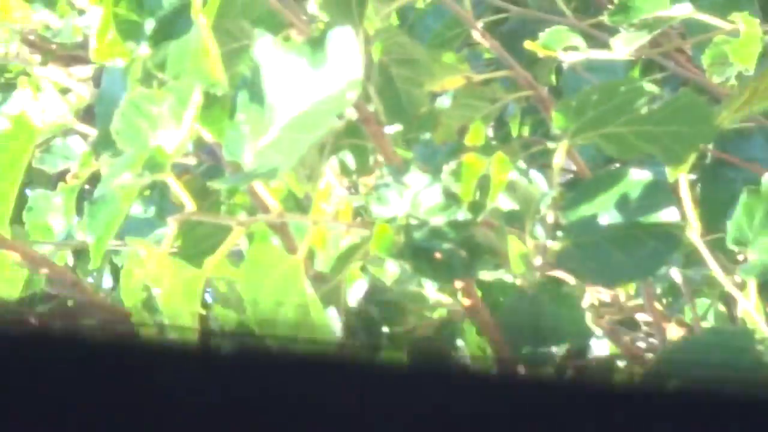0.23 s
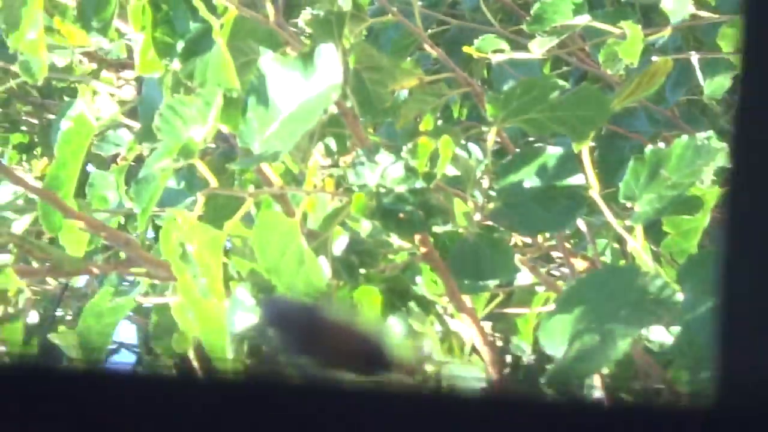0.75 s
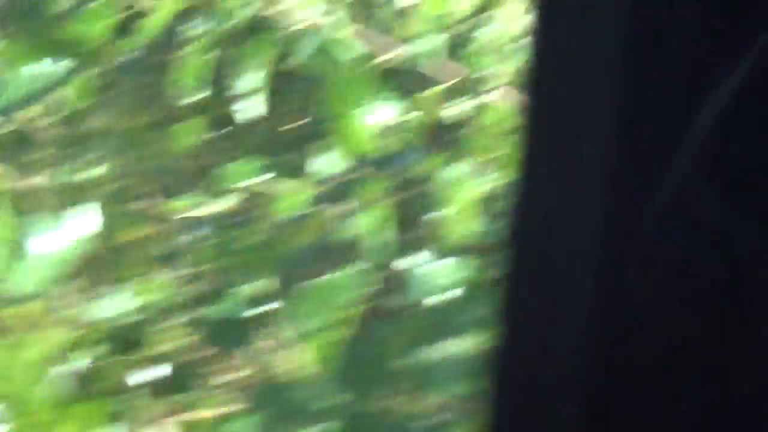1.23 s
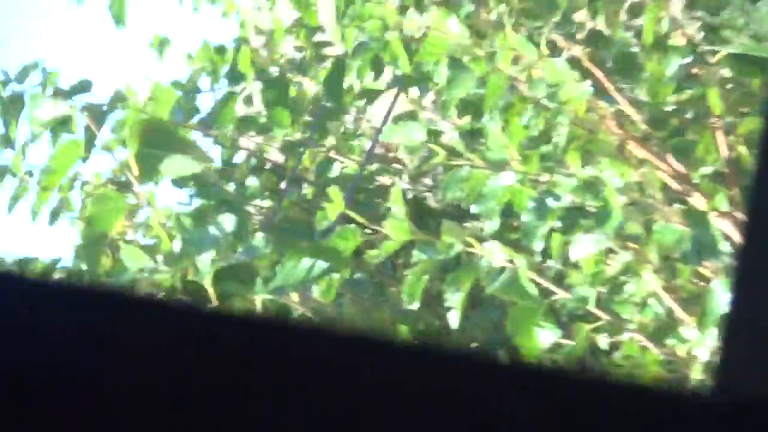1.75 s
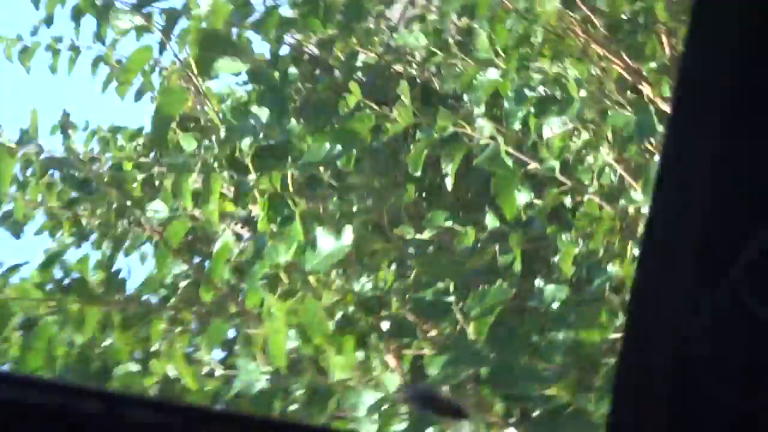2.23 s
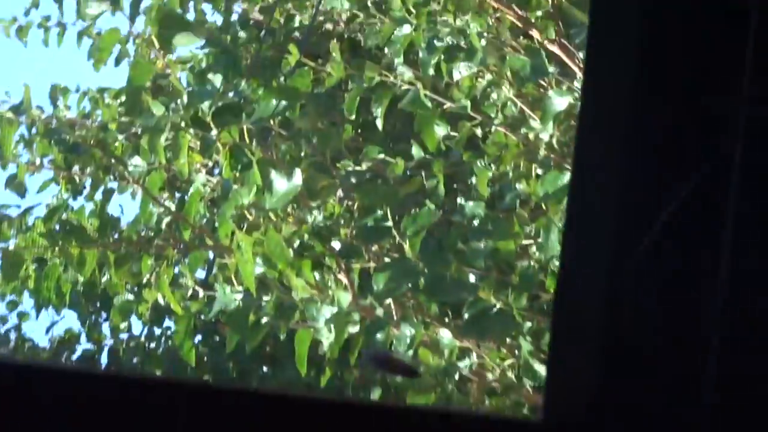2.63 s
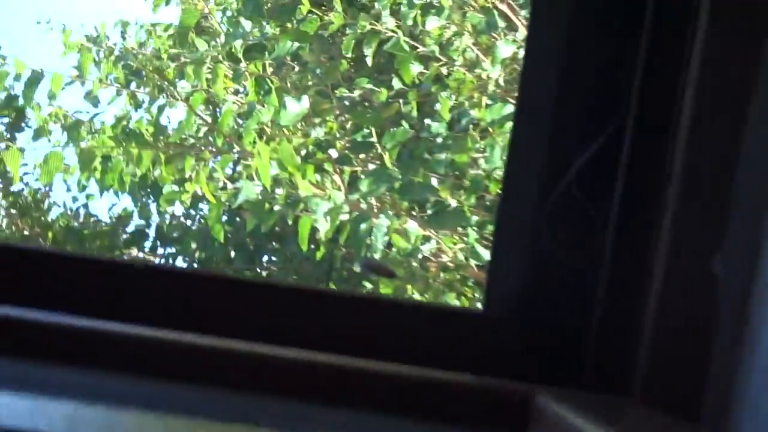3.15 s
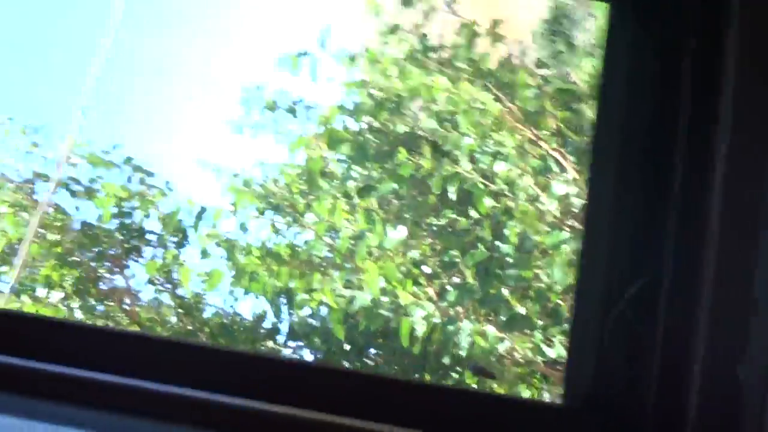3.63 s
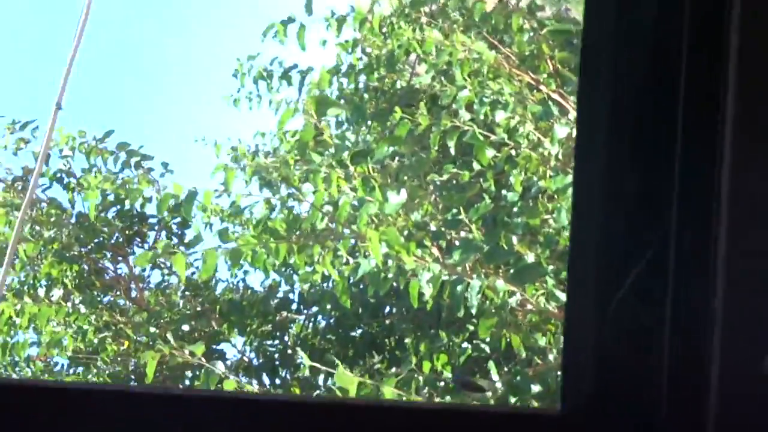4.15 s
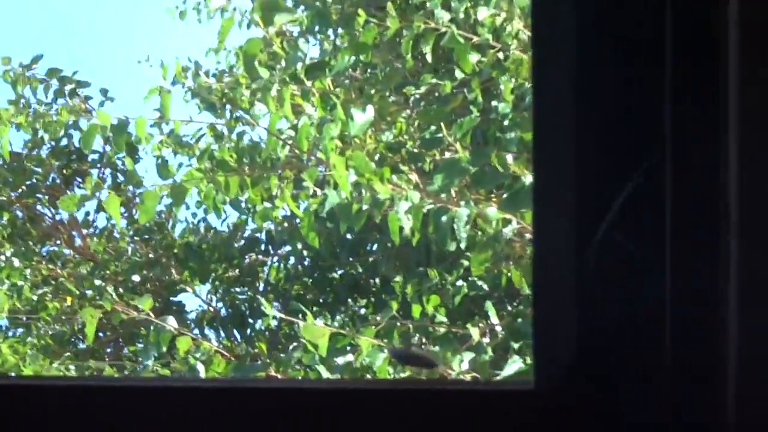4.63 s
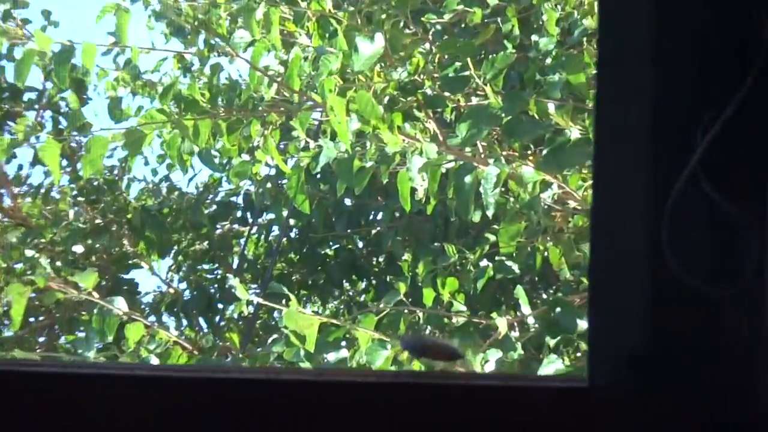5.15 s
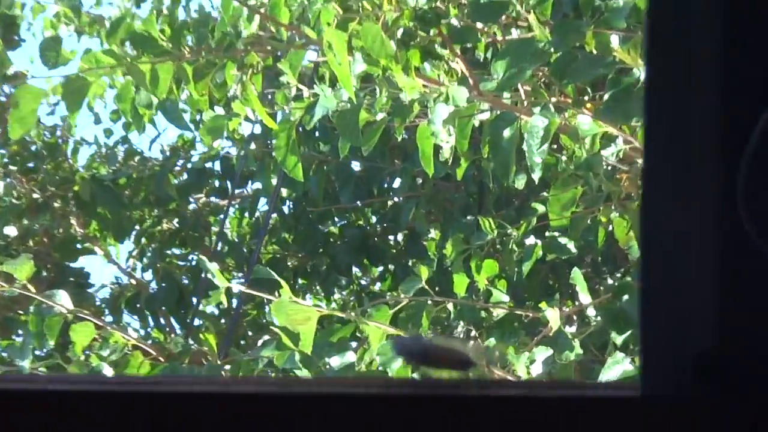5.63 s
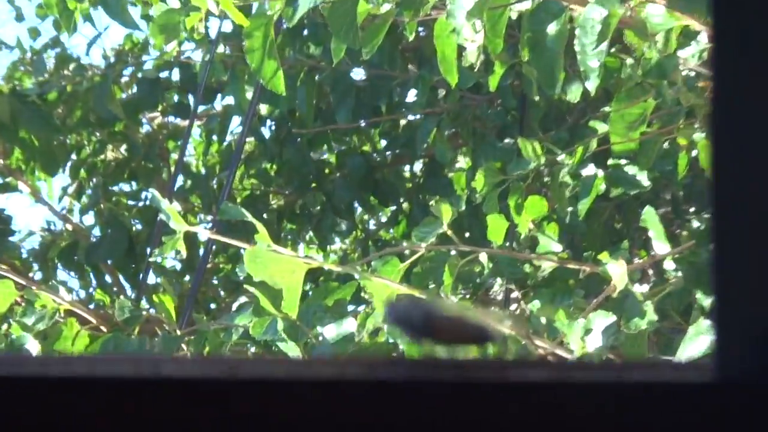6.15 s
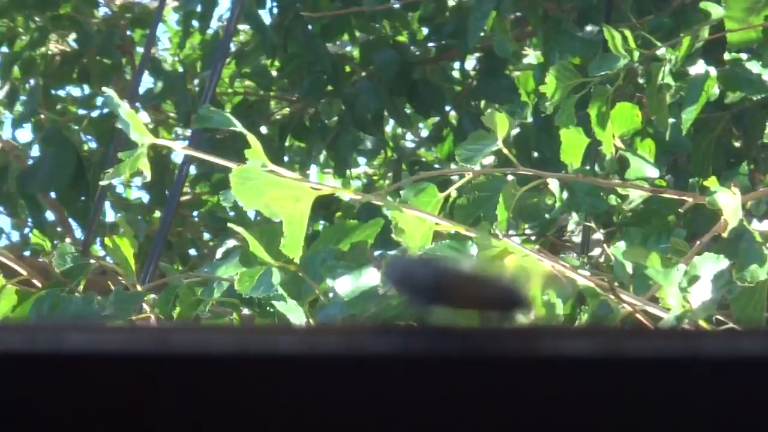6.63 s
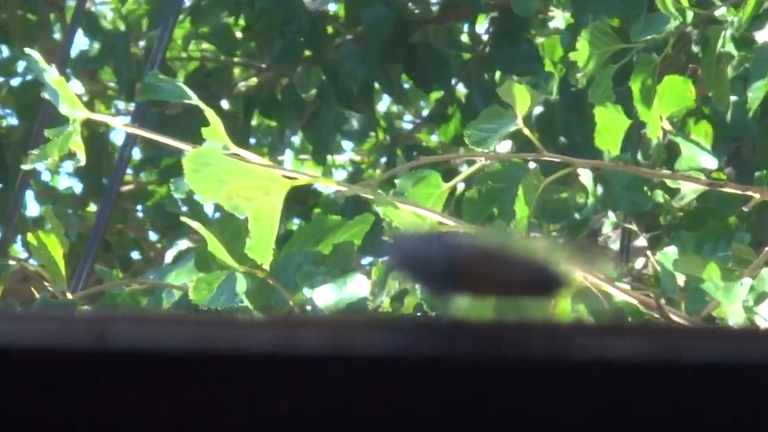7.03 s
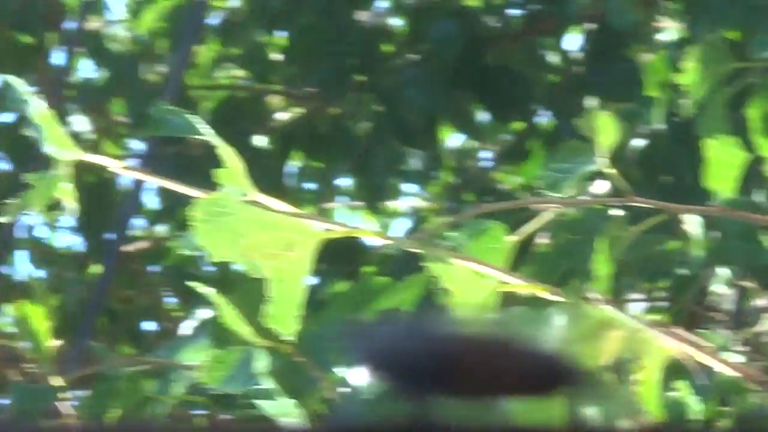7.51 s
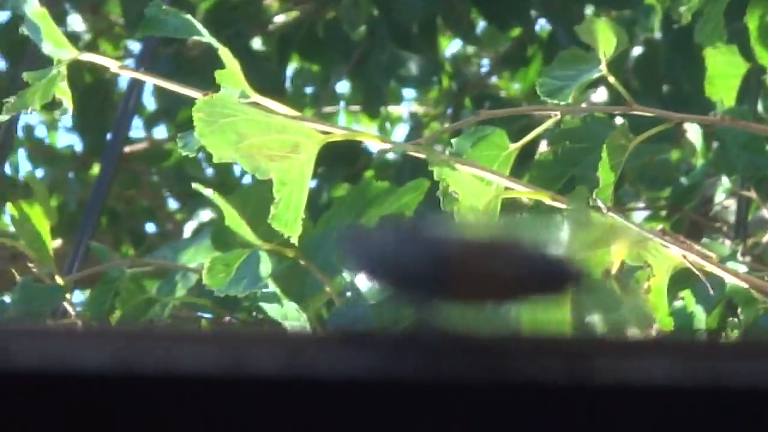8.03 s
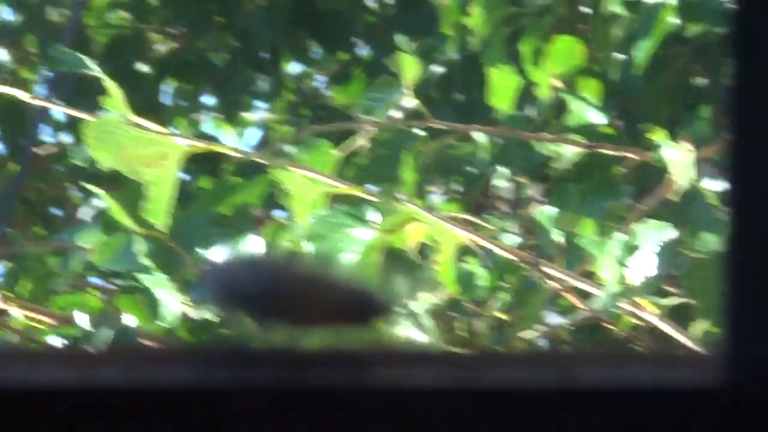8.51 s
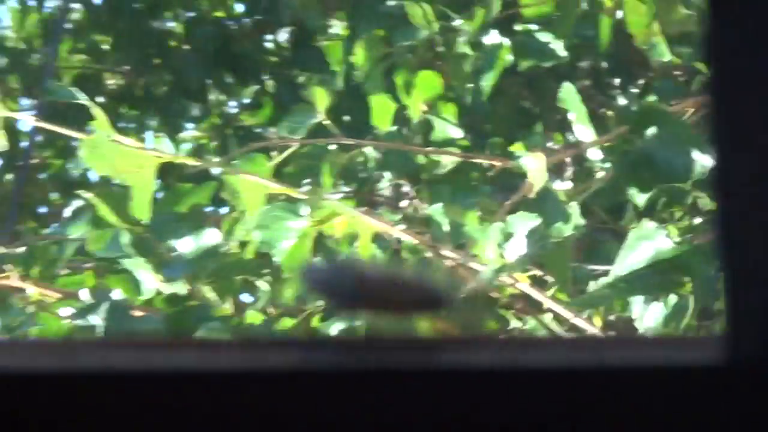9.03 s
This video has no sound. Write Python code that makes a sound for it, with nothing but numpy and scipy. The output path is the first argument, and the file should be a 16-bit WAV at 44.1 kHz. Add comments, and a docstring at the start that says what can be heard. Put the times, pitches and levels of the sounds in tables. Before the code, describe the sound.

One cicada sings close to the microphone at a window for the whole nine seconds or so. The song is a shrill, high, rasping buzz broken into short, even chirps, about six a second, with a slight echo from the room. It is loud from the start and builds until about 1.5 seconds, then drops a little. It swells briefly around 4 seconds, eases and slows slightly from 4.5 to 6.5 seconds, then returns louder from about 7 seconds, turning brighter and sharper near 9 seconds. Far beneath it, a hand rubs and softly bumps the microphone, mostly in the first 5 seconds. Tiny clicks come at about 3.7, 4.7 and 7.9 seconds. A very faint thin hum sits under the first 2.5 seconds, then sinks into a barely audible hiss.

```python
"""Cicada on a window sill

A cicada sings about six chirps a second, close to a hand-held camera. Each chirp is a run of
tymbal strokes; in each stroke the ribs buckle in turn, high to low, and ring the body.
The window frame and the room throw the song back. The hand rubs and bumps the housing,
and the camera's gain control ducks the mix, thin hum and all, under the chirps."""
import sys
import numpy as np
from scipy import signal
from scipy.fft import rfft, irfft, next_fast_len
from scipy.io import wavfile
from scipy.ndimage import uniform_filter1d, map_coordinates

SR = 44100
rng = np.random.default_rng(int(sys.argv[2]) if len(sys.argv) > 2 else 0)


def dump_mix(stems):
    """Bounce the given channels to the path in sys.argv[1] as a 16-bit WAV at rate SR."""
    frames = np.atleast_2d(stems).T  # one column per channel
    limited = np.clip(frames, -1, 1)  # hard clip at full scale
    pcm = np.round(limited * 32767).astype(np.int16)
    wavfile.write(sys.argv[1], SR, pcm)


N = 408807
TIME = np.arange(N) / SR
FILTER_HZ = np.fft.rfftfreq(2048, 1 / SR)
SIDE = np.array([[1], [-1]])  # adds on the left, subtracts on the right

# chirp cues: t/s, length/s, level/dB
CHIRPS = [(0, 0.064, -17.5), (0.135, 0.073, -18), (0.281, .078, -16.5), (0.435, 0.086, -16),
          (.601, 0.079, -15.5), (.75, 0.085, -15.5), (.899, 0.079, -14.5), (1.048, 0.1, -15.5),
          (1.204, 0.086, -14.5), (1.351, 0.075, -14), (1.485, 0.073, -14.5), (1.64, 0.092, -17.5),
          (1.816, .083, -19), (1.967, 0.08, -18.5), (2.121, 0.094, -18.5), (2.293, 0.093, -18),
          (2.45, 0.081, -19.5), (2.618, .11, -19.5), (2.799, .085, -19), (2.962, 0.087, -19.5),
          (3.109, 0.071, -20), (3.245, 0.082, -19), (3.399, .086, -19), (3.557, 0.076, -20),
          (3.696, .098, -17), (3.858, 0.086, -16.5), (4.03, 0.095, -16), (4.224, .1, -16),
          (4.424, 0.085, -17.5), (4.626, 0.087, -20.5), (4.823, 0.084, -20), (5.012, .092, -20.5),
          (5.204, 0.094, -20.5), (5.382, 0.089, -20), (5.567, 0.072, -20), (5.72, .088, -20.5),
          (5.899, 0.088, -20), (6.069, 0.071, -21), (6.221, 0.076, -19.5), (6.387, 0.082, -20),
          (6.555, 0.087, -20), (6.736, 0.074, -17), (6.919, 0.063, -15.5), (7.102, 0.06, -15),
          (7.284, 0.068, -16), (7.439, 0.084, -15), (7.609, 0.076, -15), (7.76, 0.083, -15),
          (7.93, 0.088, -15), (8.093, 0.078, -15), (8.261, .096, -14), (8.45, 0.084, -15),
          (8.609, 0.087, -15.5), (8.776, 0.083, -15.5), (8.945, 0.088, -16), (9.121, 0.097, -19)]
# resonances of tymbals and abdomen: f/Hz, width/Hz, level/dB
BODY_MODES = [(2408, 338, -22), (2806, 700, -25), (3348, 230, -23.5), (4190, 440, -8.5), (4667, 550, 0.5),
              (5326, 106, 2.5), (5722, 283, -1.5), (6157, 683, -9.5), (7713, 485, -14), (8240, 640, -17.5),
              (10003, 556, -9.5), (10730, 670, -19), (12250, 390, -27.5), (13300, 900, -32.5),
              (15100, 1500, -30.5), (14400, 540, -35), (8070, 3830, -22)]
# EQ ride as the camera moves: t/s, rasp/dB, shrill/dB, top/dB
COLOUR_RIDE = [(0, 4.5, 8, 4), (1.48, 3.3, 6, 4), (1.85, .7, 0, 2.5), (2.299, 1.5, -2, 3), (2.8, 3, 4.5, 2),
               (3.399, -1.5, -1, 1), (3.75, 1.5, 5.5, -2), (4.45, 0.5, 5.5, 0), (5.25, 2.5, 4.5, 2),
               (6.071, -5, -1.5, -2.5), (6.55, -3.5, 0, 1.5), (6.8, -1.5, 4, .5), (7.802, -1.5, 5, 3),
               (8.75, 3.5, 15.5, 5), (9.15, 7.5, 14.5, 9)]

def cicada(rasp_hz=(2560, 1440), shrill_hz=(7440, 2320), top_hz=(9950, 650)):
    """Tymbal strokes ring the body; three EQ bands (centre, width) shade each chirp."""
    body, song = humps(BODY_MODES, FILTER_HZ), np.zeros(N)
    times, *rides = np.transpose(COLOUR_RIDE)
    bands = [bell(FILTER_HZ, *band) for band in (rasp_hz, shrill_hz, top_hz)]
    for start, length, db in CHIRPS:
        colour_db = sum(np.interp(start, times, ride) * band for ride, band in zip(rides, bands))
        chirp = signal.fftconvolve(tymbals(start, length), ring(body * amp(colour_db)))
        rms = np.sqrt(np.sum(chirp ** 2) / (length * SR))
        add(song, start, chirp * amp(db) / rms)
    return song


# pace of the tymbal muscle: t/s, stroke rate/Hz
STROKE_RATE = [(0, 197), (.4, 234), (.8, 227), (1.3, 258), (3, 226), (5, 240), (9.2, 255)]
# ribs in buckling order: t/s into the stroke, f/Hz, level/dB
RIBS = [(.0004, 5720, -4.5), (.0009, 5300, -3.5), (.0015, 5140, -2.5), (.0022, 4680, 0.5),
        (.0029, 4540, -0.5)]

def tymbals(start, length, gap_s=0.0082, slow_start=0.15, settle_s=0.016, ring_db=-4.5, uneven_db=0.5):
    """One lone stroke, a gap, then strokes quickening to a steady rate: rib clicks and a falling ring."""
    period, strokes = 1 / read(STROKE_RATE, start), [0, gap_s]
    while strokes[-1] + period < length:
        drag = slow_start * np.exp(-(strokes[-1] - gap_s) / settle_s)
        strokes.append(strokes[-1] + period * (1 + drag))
    stroke_jitter_s, rib_offset_s, rib_jitter_s = 4e-5, 4e-5, 4.5e-5
    lag, force, *slips = rng.standard_normal((2 + len(RIBS), len(strokes)))
    strokes = np.array(strokes) + stroke_jitter_s * lag

    def pulses(times):
        """One push of the muscle at each time."""
        pushes = np.zeros(int(length * SR) + SR // 50)
        pushes[np.clip(times * SR, 0, len(pushes) - 1).astype(int)] = amp(uneven_db * force)
        return pushes

    delays, pitch_hz, rib_db = np.transpose(RIBS)
    clicks = 0
    for delay, db, slip in zip(delays, rib_db, slips):
        scatter = rib_offset_s * rng.standard_normal() + rib_jitter_s * slip
        clicks += amp(db) * pulses(strokes + delay + scatter)
    # the ribs keep one vibration going, which drops in pitch as the tymbal caves in
    t = TIME[:int((delays.max() + delays.min()) * SR)]
    swell = amp(np.interp(t, delays, rib_db)) * signal.windows.tukey(len(t), 1 / 3)
    tone = swell * np.sin(2 * np.pi * np.cumsum(np.interp(t, delays, pitch_hz)) / SR)
    tone *= amp(ring_db) * np.linalg.norm(amp(rib_db)) / np.linalg.norm(tone)
    return clicks + np.convolve(pulses(strokes), tone)[:len(clicks)]


# bounce off the window frame: t/s, delay/s
FRAME_DELAY = [(0, 0.0022), (1.5, 0.0028), (3.5, 0.0021), (6, 0.0028), (7.3, .0036), (9.27, 0.0029)]

def frame_echo(song, echo_db=-14):
    """One hard reflection whose path changes with the camera: a slowly sliding comb."""
    return amp(echo_db) * map_coordinates(song, [(TIME - read(FRAME_DELAY, TIME)) * SR], order=3)


# reverb send, lower as the camera closes in: t/s, level/dB
ROOM_SEND = [(.1, 5), (1.25, -2.5), (2, 1), (3.35, -1.5), (4.65, -1), (6.4, -5), (7.15, -3), (8.05, -7),
             (8.4, -4.5), (9.2, -3.5)]
# reverb time: f/Hz, T60/s
ROOM_T60 = [(500, 1), (2500, 0.48), (5000, 0.26), (10000, .28), (16000, 0.31)]

def room(song, early_db=-10, early_decay_s=0.0073, tail_db=-3, echoes_per_s=2500, patterns=4):
    """Early reflections off the frame and a room tail; echo patterns crossfade as the camera moves."""
    send = song * amp(read(ROOM_SEND, TIME))
    t, wet = TIME[:SR // 2], np.zeros(N)
    for k in range(patterns):
        taps = rng.standard_normal(len(t)) * (rng.random(len(t)) < echoes_per_s / SR) * (t > 0.002)
        hz, age, spectrum = signal.stft(taps, SR, nperseg=256)
        decay = amp(-60 * age / read(ROOM_T60, hz)[:, None])
        tail = signal.istft(spectrum * decay, SR, nperseg=256)[1][:len(t)]
        early = rng.standard_normal(len(t)) * np.exp(-t / early_decay_s) * (t > 0.001)
        echo = amp(tail_db) * tail / np.linalg.norm(tail) + amp(early_db) * early / np.linalg.norm(early)
        turn = (TIME * 1.341 + k) % patterns  # a new pattern about every 0.75 s
        crossfade = np.sin(np.pi / 2 * turn) * (turn < 2)
        wet += signal.oaconvolve(send * crossfade, echo)[:N]
    return wet


# pan by frequency: f/Hz, left minus right/dB
PORT_TILT = [(2000, -1.5), (3000, -0.5), (4000, -2.5), (4800, -4), (5700, -8.5), (6500, -3.5), (7700, -10),
             (8300, -17), (9000, 1), (9350, 14), (9900, -3), (10600, 0)]
# phase between the ports: f/Hz, left lead/rad
PORT_LEAD = [(1000, -0.88), (4000, -0.56), (5000, -0.59), (6100, -1.05), (8400, -1.2), (9300, 0.81),
             (10200, .45), (11200, 0.15)]
# pan drift, played about its mean: t/s, left minus right/dB
PAN_SWAY = [(0.0, -2.5), (0.31, -2.5), (1.16, -3), (1.34, -2), (2.17, -3.5), (4.21, -2.5), (4.57, -3.5),
            (5.7, -3.5), (6.09, -4.5), (7.56, -3), (8.37, -2.5), (8.8, -2.5), (9.27, -3)]

def mic_ports(mid, side):
    """The two microphone ports hear the song with their own colour and delay."""
    size = next_fast_len(N, True) * 2
    hz = np.fft.rfftfreq(size, 1 / SR)
    gain = amp(SIDE * read(PORT_TILT, hz) / 2) * np.exp(0.5j * SIDE * read(PORT_LEAD, hz))
    pair = irfft(rfft(mid + SIDE * side, size) * gain / abs(gain.mean(0)))[:, :N]
    sway_db = read(PAN_SWAY, TIME)
    return pair * amp(SIDE * (sway_db - sway_db.mean()) / 2)


# clicks and knocks: t/s, level/dB, f/Hz, width/Hz, decay/s
TICKS = [(3.674, -30.5, 4400, 2430, 0.00092), (3.686, -25, 10000, 5000, .0005),
         (4.598, -54, 436, 1100, 0.024), (4.599, -48.5, 2810, 1580, 0.015), (4.749, -33, 4030, 910, 0.0013),
         (6.831, -68, 199, 520, 0.0084), (7.9026, -17, 4750, 1100, 0.00032),
         (7.9025, -27, 9000, 4200, .00042)]

def ticks():
    """Small handling clicks: each noise burst rings one band."""
    out, t = np.zeros(N), TIME[:SR // 2]
    for start, db, hz, width_hz, decay in TICKS:
        fade = np.exp(-t / decay)
        tick = signal.fftconvolve(rng.standard_normal(len(t)) * fade, ring(bell(FILTER_HZ, hz, width_hz)))
        add(out, start, amp(db) * tick * np.linalg.norm(fade) / np.linalg.norm(tick))
    return out


# soft thumps: t/s, level/dB, width/Hz, decay/s
BUMPS = [(0.378, -76, 45.6, 0.15), (.56, -60, 252, 0.053), (0.71, -68, 56, 0.027), (1.754, -45, 278, 0.042),
         (2.069, -58, 44.5, 0.069), (2.26, -59, 50, .05), (2.81, -58.5, 202, 0.096),
         (3.478, -56.5, 53.4, 0.099), (3.619, -58, 80, 0.037), (3.968, -55.5, 48, 0.055),
         (4.162, -71, 46, .05), (4.7, -65, 296.5, 0.06), (6.186, -59, 40.4, 0.03), (8.32, -74, 49.3, 0.045),
         (8.827, -69, 417, 0.12)]

def bumps(centre_hz=43.2, attack_s=0.0038):
    """The hand bumps the housing: dull bursts of low noise that die away."""
    out, t = np.zeros(N), TIME[:SR // 2]
    for start, db, width_hz, decay in BUMPS:
        envelope = np.exp(-t / decay) * (1 - np.exp(-t / attack_s))
        add(out, start, amp(db) * envelope * noise([(centre_hz, width_hz, 0)], len(t)))
    return out


# slides of the hand: t/s, length/s, level/dB
RUBS = [(0.532, 0.029, -54.5), (0.954, 0.22, -59), (1.139, 0.11, -55.5), (1.22, 0.078, -67),
        (1.293, 0.1, -55.5), (1.58, 0.062, -52), (1.647, 0.093, -58.5), (2.365, 0.073, -56.5),
        (2.454, 0.12, -63), (3.333, .04, -75), (3.476, .055, -68.5), (3.55, 0.1, -70), (4.308, 0.11, -72),
        (4.626, 0.081, -75)]
# resonances of the housing: f/Hz, width/Hz, level/dB
HOUSING_MODES = [(202, 107, -7), (402, 84, -3), (553, 170, -11), (754, 100, -7), (960, 330, -10.5),
                 (500, 6800, -17.5)]

def rubbing(attack_s=0.019, release_s=0.06, grip_db=-78, still_s=4.7, fade_s=1.7, uneven_db=3, trim_db=1):
    """Each slide of the hand swells, holds and dies away; its uneven friction rings the housing."""
    # the grip creaks faintly until the hand settles
    power = amp(grip_db) ** 2 * np.clip((still_s - TIME) / fade_s, 0, 1)
    for start, length, db in RUBS:
        attack = np.clip((TIME - start) / attack_s, 0, 1)
        release = np.exp(-np.maximum(TIME - start - length, 0) / release_s)
        power += (amp(db) * attack * release) ** 2
    friction = amp(trim_db + uneven_db * noise([(0, 30, 0)]))
    return np.sqrt(power) * friction * wide(HOUSING_MODES, spread=0.23)


# faders for the camera's own noise: t/s, hum/dB, whirr/dB, drone/dB
HUM_RIDE = [(0, -59, -66, -96), (1.2, -62.5, -68.5, -88), (2.3, -63.5, -66.5, -98), (2.6, -80, -78, -98),
            (3.9, -89, -78.5, -96), (4.199, -70, -75.5, -94), (4.601, -79.5, -79, -91),
            (5.2, -83, -78.5, -83), (6, -86, -84, -91), (7.1, -82, -82.5, -96), (9.2, -85.5, -80, -96)]

def camera_hum(hum_hz=1088, wander_hz=1.13):
    """A thin wavering hum, a whirr just above it and a low drone."""
    times, *rides = np.transpose(HUM_RIDE)
    hum, whirr, drone = (amp(np.interp(TIME, times, db)) for db in rides)
    pitch_hz = hum_hz + wander_hz * noise([(0, 16, 0)])
    tone = np.sqrt(2) * np.sin(2 * np.pi * np.cumsum(pitch_hz) / SR)
    waver = 1 + 0.19 * noise([(0, 25, 0)])
    return hum * tone * waver + whirr * wide([(1159, 194, 0)]) + drone * wide([(425, 65, 0)])


def noise_floor(mids_db=-84, rumble_db=-88, hiss_db=-75):
    """The camera's quiet bed: soft mids, centred rumble and broad hiss."""
    mids = amp(mids_db) * wide([(501.8, 1300, 0)])
    rumble = amp(rumble_db) * noise([(30, 340, 0)])
    return mids + rumble + amp(hiss_db) * wide([(11700, 24000, 0)])


def amp(db):
    return 10 ** (np.asarray(db) / 20)


def read(points, at):
    return np.interp(at, *np.transpose(points))


def add(mix, start, sound):
    part = mix[max(round(start * SR), 0):][:len(sound)]
    part += sound[:len(part)]


def bell(hz, centre_hz, width_hz):
    """An EQ bell of height 1 with the given half-power width."""
    return 2 ** (-2 * ((hz - centre_hz) / width_hz) ** 2)


def humps(modes, hz):
    """Gain of resonances (f/Hz, width/Hz, level/dB) whose powers add."""
    return np.sqrt(sum((amp(db) * bell(hz, centre, width)) ** 2 for centre, width, db in modes))


def ring(gain):
    """The minimum-phase impulse response that has this gain."""
    cepstrum = irfft(np.log(np.maximum(gain, 3e-5)))
    half = len(cepstrum) // 2
    cepstrum[1:half] *= 2
    cepstrum[half + 1:] = 0
    return irfft(np.exp(rfft(cepstrum)))[:half]


def noise(modes, size=N):
    """Noise of rms 1 in the given resonances."""
    padded = next_fast_len(size, True) * 2
    white = rfft(rng.standard_normal(size), padded)
    coloured = irfft(white * humps(modes, np.fft.rfftfreq(padded, 1 / SR)))[:size]
    return coloured / np.sqrt(np.mean(coloured ** 2) + 1e-20)


def wide(modes, spread=0.75):
    """Stereo noise that the two ports hear partly alike."""
    return noise(modes) + spread * noise(modes) * SIDE


def scene(song_db=-0.02, side_db=-13.5):
    """The song and its echoes up front, the sounds of the camera underneath."""
    direct = cicada()
    mid = direct + frame_echo(direct) + room(direct)
    song = mic_ports(mid, amp(side_db) * room(direct))
    return amp(song_db) * song + ticks() + bumps() + rubbing() + camera_hum() + noise_floor()


def record(dry, knee_db=-21, squeeze=0.41, recovery_db_per_s=280, makeup_db=0.5, cutoff_hz=15800):
    """Gain control ducks at once on each chirp and recovers in the gap; a low-pass trims the top."""
    peak_db = 20 * np.log10(abs(dry).mean(0) + 1e-9)
    recovery_db = TIME * recovery_db_per_s
    held_db = np.maximum.accumulate(peak_db + recovery_db) - recovery_db
    over_db = np.maximum(held_db - knee_db, 0)
    eased_db = uniform_filter1d(uniform_filter1d(over_db, size=70), size=50)
    ducked = dry * amp(makeup_db - squeeze * eased_db)
    lowpass = signal.firwin(511, cutoff_hz, window=("kaiser", 9), fs=SR)
    return signal.oaconvolve(ducked, lowpass[None], "same")


dry = scene()
out = record(dry)
dump_mix(out)
```